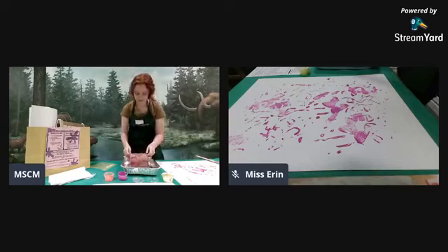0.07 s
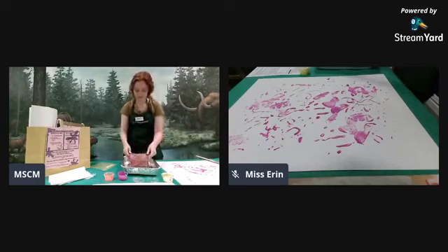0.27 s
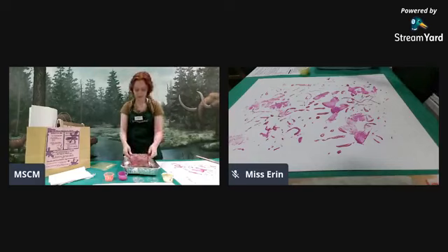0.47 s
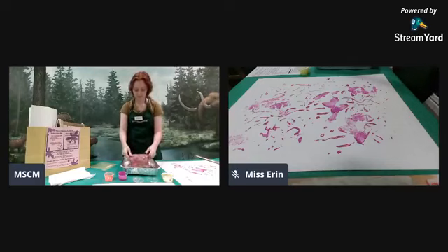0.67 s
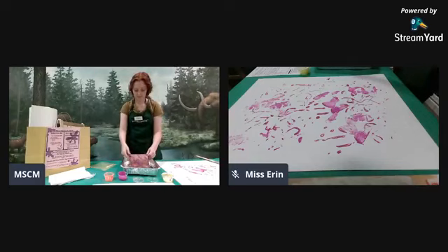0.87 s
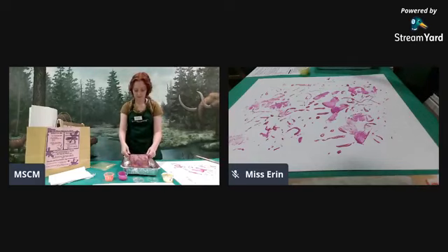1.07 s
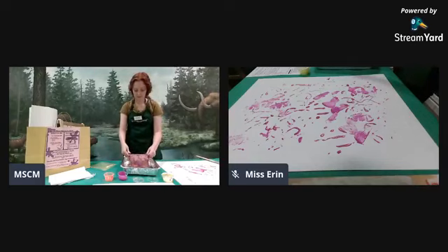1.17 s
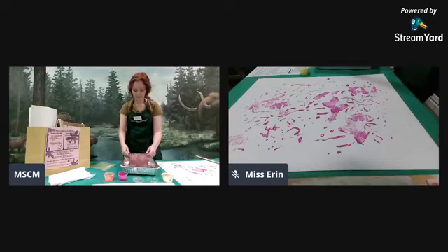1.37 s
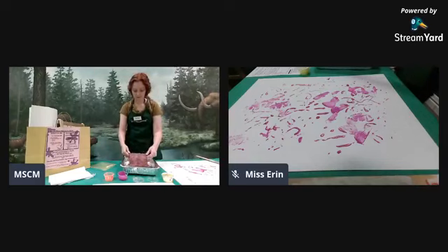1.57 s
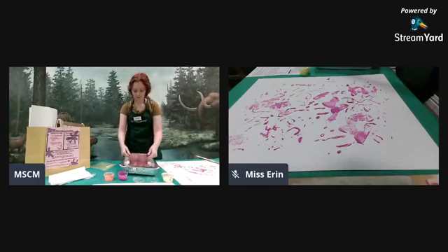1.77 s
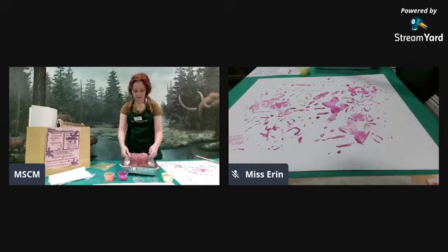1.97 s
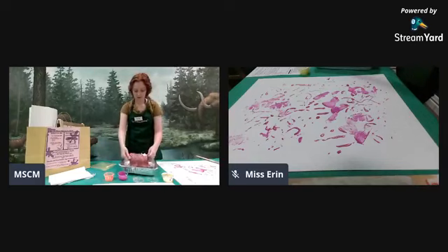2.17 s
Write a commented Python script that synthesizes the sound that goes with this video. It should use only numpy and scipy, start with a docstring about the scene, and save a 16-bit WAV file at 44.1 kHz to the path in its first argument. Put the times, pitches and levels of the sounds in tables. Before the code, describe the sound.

A hand roller works through wet paint in a foil tray on a table, indoors, over a quiet, steady hum and hiss. Each pull releases a short cluster of sticky snaps that gives the tray a hollow rattle and rings briefly in the room. One clear snap comes right at the start, then an irregular run of lighter ones from about 0.2 to 0.8 seconds, with tiny bright foil ticks. After a short lull, stronger pulls arrive from 1.1 seconds, the loudest at about 1.4 seconds. Softer pulls follow from 1.5 to 2.1 seconds, with three faint, thin, wet squeaks between 1.6 and 1.9 seconds. Throughout, the paint sizzles faintly as it splits behind the roller, and the table gives soft low bumps and rumbles, most noticeably around 0.7, 1.2 and 1.5 seconds.

```python
"""A hand roller is worked through wet paint in a foil tray on a table, over a low hum and hiss.
From the start, each pull makes the sticky paint let go in a cluster of snaps that rattles the tray
and rings briefly in the room, while the paint sizzles faintly and the table rumbles.
The loudest pulls come a little past halfway; softer ones and three faint, wet squeaks follow."""
import sys
import numpy as np
from scipy import signal
from scipy.fft import rfft, irfft, next_fast_len
from scipy.io import wavfile
from scipy.ndimage import uniform_filter1d

SR = 44100
rng = np.random.default_rng(int(sys.argv[2]) if len(sys.argv) > 2 else 0)


def to_wav(s):
    """Save 16-bit WAV."""
    ch = np.atleast_2d(s).T  # columns
    pcm = np.round(np.clip(ch, -1, 1) * 32767)  # PCM
    wavfile.write(sys.argv[1], SR, pcm.astype(np.int16))


N = 97946
TIME = np.arange(N) / SR

# pulls of the roller: t/s, length/s, base level/dB, weight on the tray/dB, hardness of the snap/dB,
# pitch of the tray floor's note/Hz, that note's level above the base/dB
PULLS = [(0.024, 0.037, -41.5, -6.5, 3.5, 832, -0.5), (.232, .034, -60.5, 1.5, 8, 867, -17),
         (0.333, 0.035, -66.5, 7, -13, 487, 4.5), (0.3644, 0.034, -49.5, 8.5, -7.5, 955, 1.5),
         (0.423, 0.021, -51, 8, 10.5, 987, 4.5), (.498, 0.018, -49, 6, 2, 952, 1.5),
         (.560, 0.019, -50.5, -13, 4, 922, 2), (0.664, 0.02, -50.5, 9, -15.5, 609, 2.5),
         (0.713, .027, -46, 3, 2, 885, 2), (0.783, 0.022, -65, -16, -16, 820, -2),
         (1.073, 0.044, -52, 5, -7, 780, -10), (1.1498, 0.038, -39, 5, 1.5, 936.5, -5.5),
         (1.262, 0.025, -38.5, -1, 4.5, 760.6, -1), (1.327, 0.028, -53, -0.5, 9, 750, -23),
         (1.3628, 0.03, -30, -5, 9.5, 641, -6), (1.483, 0.048, -51, 2.5, 1.5, 936, -9),
         (1.53, 0.017, -48, 4, -12.5, 965, 2.5), (1.591, 0.023, -48, -12, 1, 814, -8),
         (1.652, 0.018, -48.5, 2, -6.5, 952, 9), (1.846, 0.035, -44.5, -11.5, -2, 640.7, 3),
         (2.011, .039, -49, -9, -2, 852, -8), (2.076, 0.014, -55.5, -6, 4, 829, -13)]
# tone colour of one snap of paint: f/Hz, gain/dB
SNAP_COLOUR = [(120, -42), (250, -11.5), (400, -7), (600, -10.5), (800, 5), (950, 2), (1060, -7.5),
               (1250, -9.5), (1450, -27.5), (1750, -35.5), (3000, -39), (5000, -41), (6200, -58),
               (9000, -49)]


def from_db(db):
    """Turn decibels into a factor to multiply by."""
    return 10 ** (np.asarray(db) / 20)


def rms_one(x):
    """Scale a sound so that its average strength (rms) is 1."""
    return x / np.sqrt(np.mean(x ** 2) + 1e-24)


def even(x, window_s):
    """Smooth out quick changes in loudness."""
    local_power = uniform_filter1d(x * x, max(int(window_s * SR), 2)).clip(0)
    return x / np.sqrt(local_power + 0.046 * np.mean(x * x))


def add(out, s, sound):
    """Mix a sound in, starting at s seconds."""
    i = max(round(s * SR), 0)
    out[i:i + len(sound)] += sound[:N - i]


def band(x, low_hz, high_hz, order=2):
    """Keep the part of a sound between two frequencies."""
    return signal.sosfilt(signal.butter(order, [low_hz, high_hz], "band", fs=SR, output="sos"), x)


def band_noise(size, low_hz, high_hz):
    """Noise of strength 1 between two frequencies."""
    return rms_one(band(rng.standard_normal(size), low_hz, high_hz))


def colour(x, spectrum):
    """Shape a sound's tone by rows of f/Hz, gain/dB."""
    size = next_fast_len(len(x) + 2048)
    hz, db = np.transpose(spectrum)
    bins_hz = np.maximum(np.arange(size // 2 + 1) * SR / size, 1)
    gain = from_db(np.interp(np.log(bins_hz), np.log(hz), db))
    return irfft(rfft(x, size) * gain, size)[:len(x)]


def resonate(x, hz, width_hz):
    """Let a sound ring at one pitch; a narrower width rings longer."""
    r = np.exp(-np.pi * width_hz / SR)
    feedback = [1, -2 * r * np.cos(2 * np.pi * hz / SR), r * r]
    return signal.lfilter(np.array([1, 0, -1]) * (1 - r * r) / 2, feedback, x)


def swells(rows):
    """Smooth rises and falls in loudness, one for each row of peak t/s, length/s, level/dB."""
    return sum(from_db(db) * np.exp(-(2 * (TIME - s) / length) ** 2) for s, length, db in rows)


def wavering(hz, waver_hz, t60, rise_s, wobble_hz):
    """A ring whose pitch wavers as the surface bends; it fades by 60 dB in t60 seconds."""
    t = np.arange(SR // 2) / SR
    pitch = hz + waver_hz * band_noise(len(t), wobble_hz / 8, wobble_hz)
    swing = (1 - np.exp(-t / rise_s)) * from_db(-60 * t / t60)
    return np.sqrt(2) * swing * np.sin(2 * np.pi * np.cumsum(pitch) / SR)


def room(x, t60, echo_db, first_echo_s=0.0057):
    """The direct sound, then a wash of echoes from the walls that dies away."""
    t = np.arange(len(x)) / SR
    tail = rng.standard_normal(len(t)) * from_db(-60 * t / t60) * np.clip(t / first_echo_s - 1, 0, 1)
    echoes = signal.fftconvolve(x, tail)[:len(x)]
    return x + from_db(echo_db) * np.std(x) * rms_one(echoes)


def background(air_db=-76):
    """Electrical mains hum and the steady hiss of the room's air."""
    hum_tones = [(60, -86.5), (119, -81)]   # mains hum: f/Hz, level/dB
    air_colour = [(20, -17), (60, -9), (120, 8), (200, -0.5), (400, -11.5), (800, -6), (1400, -25),
                  (3000, -17.5), (7000, -27), (16000, -39)]   # tone colour of the quiet room: f/Hz, gain/dB
    hum = sum(from_db(db) * np.sqrt(2) * np.sin(2 * np.pi * (hz * TIME + rng.random()))
              for hz, db in hum_tones)
    return hum + from_db(air_db) * rms_one(colour(rng.standard_normal(N), air_colour))


def table_rumble(rest_db=-82.5):
    """The roller's weight makes the table top rumble, most at each shove."""
    shoves = [(.36, 0.046, -69), (.44, .04, -71), (.545, 0.056, -67.5), (.715, 0.084, -64.5),
              (1.03, 0.033, -77), (1.155, 0.022, -71), (1.49, 0.079, -62), (1.57, 0.083, -71),
              (2.05, .05, -71)]   # shoves of the roller: peak t/s, length/s, level/dB
    return np.hypot(swells(shoves), from_db(rest_db)) * band_noise(N, 52, 85)


def table_bumps():
    """The table top gives under the hand with soft, low bumps."""
    bumps = [(0.431, -62, 188.4, 28, .25), (0.502, -64.5, 216, 17, 0.38), (0.719, -55.5, 166.6, 53, 0.31),
             (1.235, -53, 239.7, 19, .35), (1.655, -59.5, 236.4, 17, 0.3), (2.027, -60.5, 116.8, 14, 0.32)]   # bumps of the table: t/s, level/dB, f/Hz, waver/Hz, fade time/s
    out = np.zeros(N)
    for s, db, hz, waver_hz, t60 in bumps:
        add(out, s, from_db(db) * wavering(hz, waver_hz, t60, rise_s=0.0081, wobble_hz=81.4))
    return out


def snaps(size, per_s, spread_db):
    """Threads of paint break at random moments, with uneven strength."""
    strength = from_db(spread_db * np.minimum(rng.exponential(1, size), 4))
    direction = rng.choice([-1, 1], size)
    breaks = rng.random(size) < per_s / SR
    return strength * direction * breaks + 1e-18


def paint_film(boost_db=3.5, rest_db=-79, squeak_hz=7450):
    """The paint splits behind the roller in countless tiny ticks, at times with a smack or a squeak."""
    sizzle_colour = [(1500, -3), (3000, -17.5), (5000, -10), (6500, -10.5), (8000, -8.5), (9200, 0),
                     (10300, 1), (12000, -2), (15500, -1.5)]   # tone colour of the sizzle: f/Hz, gain/dB
    sizzle_levels = [(0, -79), (.3, -80.5), (.42, -75), (.64, -81), (.73, -74.5), (.98, -85.5),
                     (1.17, -73.5), (1.33, -78), (1.58, -75), (1.75, -81), (1.88, -80), (2.02, -80.5),
                     (2.22, -84)]   # sizzle as the roller travels: t/s, level before boost/dB
    smacks = [(.04, .03, -75.5), (.265, 0.073, -71), (.38, .04, -68.5), (.438, .04, -68),
              (1.276, 0.018, -65.5), (1.372, .025, -63), (1.605, 0.059, -71.5), (1.855, 0.064, -70.5),
              (1.925, 0.072, -69.5)]   # wet smacks where the paint tears wide: peak t/s, length/s, level/dB
    squeaks = [(1.607, 0.035, -82), (1.855, 0.021, -82), (1.928, 0.059, -78)]   # thin, wet squeaks: peak t/s, length/s, level/dB
    ticks = rms_one(snaps(N, per_s=1600, spread_db=-2.0))
    sizzle = rms_one(colour(ticks + rng.standard_normal(N), sizzle_colour))
    rolling = from_db(np.interp(TIME, *np.transpose(sizzle_levels)) + boost_db)
    level = np.hypot(rolling, from_db(rest_db))   # the paint never quite stops ticking
    squeaking = swells(squeaks) * band_noise(N, squeak_hz - 280, squeak_hz + 280)
    return np.hypot(level, swells(smacks)) * sizzle + squeaking


def paint_blobs(t60=0.008):
    """Single blobs of paint part, each with a short, bright tick."""
    ticks = [(.231, -83), (.369, -61), (.561, -67), (1.947, -66)]   # parting blobs: t/s, level/dB
    t = np.arange(SR // 5) / SR
    out = np.zeros(N)
    for s, db in ticks:
        add(out, s, from_db(db - 60 * t / t60) * band_noise(len(t), 3500, 16000))
    return out


def tink(hz, waver_hz, t60):
    """A brief, bright ring of thin metal in the room."""
    return room(wavering(hz, waver_hz, t60, rise_s=0.00072, wobble_hz=300), t60=0.07, echo_db=-7)


def foil_creases():
    """Creases in the foil flip, each with its own bright ring."""
    creases = [(.422, -67, 5380, 120, 0.067), (.56, -59, 5030, 302, .03), (0.559, -55, 3350, 780, 0.021),
               (1.369, -53.5, 4810, 502, 0.03)]   # flipping creases: t/s, level/dB, f/Hz, waver/Hz, fade time/s
    out = np.zeros(N)
    for s, db, hz, waver_hz, t60 in creases:
        add(out, s, from_db(db) * tink(hz, waver_hz, t60))
    return out


def roller_frame(lag_s=0.007):
    """Each pull jolts the roller's wire frame into ringing, heavy and hard pulls most of all."""
    # ringing tones of the frame: f/Hz, waver/Hz, fade time/s, level relative to the jolt/dB
    frame_tones = [(4085, 120, 0.28, -37.5), (5040, 140, 0.14, -41.5)]
    out = np.zeros(N)
    for s, _, db, weight, hardness, *_ in PULLS:
        jolt_db = db + weight + 0.5 * hardness
        for hz, waver_hz, t60, tone_db in frame_tones:
            add(out, s + lag_s, from_db(jolt_db + tone_db) * tink(hz, waver_hz, t60))
    return out


def tray_note(length, hz, rise_s=0.0096, ring_t60=0.089, waver=0.035):
    """The tray floor beside the roller rings at a pitch of its own, unsteady as it bends."""
    t = np.arange(SR // 2) / SR
    pitch = hz * (1 + waver * band_noise(len(t), 49, 200))
    swing = (1 - np.exp(-(t / rise_s) ** 2)) * from_db(-60 * np.maximum(t - length, 0) / ring_t60)
    tone = np.sqrt(2) * swing * np.sin(2 * np.pi * np.cumsum(pitch) / SR)
    return room(tone, t60=0.31, echo_db=-15.5)


def tray_rattle(length, rise_s, levels_db, release_s=0.0052, growth_db=0.5, dulling_db_per_s=376.5):
    """A cluster of snaps shakes the tray, heard in five bands from low thud to high crackle."""
    edges_hz = [150, 420, 700, 1050, 1700, 7000]   # edges of the five bands: f/Hz
    resonances = [(296.3, 39, 2), (490.2, 13, 10.5), (521.8, 25.6, 11), (628.4, 19.7, 12.5),
                  (767, 35, -1.5), (883, 30, 5.5), (981.7, 17.3, 2), (1216, 72, -7), (1393, 10, -1),
                  (2700, 49, 3), (4270, 350, -12), (5430, 73, -12.5)]   # where the tray on the table rings: f/Hz, width/Hz, gain/dB
    echoes = [(0.42, 1), (0.22, -1), (0.24, -6.5), (0.23, -5), (0.11, -6)]   # the room's echo in each band: fade time/s, relative level/dB
    t = np.arange(SR // 2) / SR
    spread = np.sin(np.pi / 2 * np.minimum(t / max(rise_s, .001), 1)) ** 2   # the tear runs along the roller
    release = np.exp(-np.maximum(t - length, 0) / release_s)
    grip = spread * from_db(growth_db * np.minimum(t / length, 1)) * release
    tearing = colour(snaps(len(t), per_s=2000, spread_db=1.5), SNAP_COLOUR)
    loud_samples = int((length + .006) * SR)
    out = np.zeros(len(t))
    for low, high, db, (t60, echo_db) in zip(edges_hz, edges_hz[1:], levels_db, echoes):
        dulling = from_db(-dulling_db_per_s * t * low / edges_hz[-2])   # lower bands fade more slowly
        force = grip * dulling * even(band(tearing, low, high, order=4), window_s=.008)
        ringing = sum(from_db(gain_db) * resonate(force, hz, width) for hz, width, gain_db in resonances)
        heard = room(force + ringing, t60, echo_db)
        out += from_db(db) * heard / np.std(heard[:loud_samples])
    return out


def tray_pulls(note_lag_s=0.00199, overtone_ratio=1.8, overtone_db=-8.5):
    """Each pull rattles the tray and wakes a note; weight brings out the lows, hardness the highs."""
    # how each band answers a pull: gain/dB, share of the weight, share of the hardness
    answers = [(-16, 0.76, 0.28), (-4, 0.46, 0.021), (0.76, -0.022, 0.031), (-17.5, 0.013, 1.0),
               (-29.5, 0.24, 1)]
    out = np.zeros(N)
    for s, length, db, weight, hardness, hz, note_db in PULLS:
        levels_db = [db + band_db + by_weight * weight + by_hardness * hardness
                     for band_db, by_weight, by_hardness in answers]
        rise_s = 0.0082 * 2 ** (-(weight + hardness) / 13)   # a heavy, hard pull tears faster
        add(out, s, tray_rattle(length, rise_s, levels_db))
        held_s = 0.94 * length   # the note holds for most of the tear
        overtone_hz = overtone_ratio * hz
        snap_db = np.interp(overtone_hz, *np.transpose(SNAP_COLOUR))   # the snap's strength at that pitch
        overtone = from_db(overtone_db + snap_db) * tray_note(held_s, overtone_hz)
        add(out, s + note_lag_s, from_db(db + note_db) * (tray_note(held_s, hz) + overtone))
    return out


def scene():
    """Tray, roller, paint, table and background, mixed into one channel."""
    metal = tray_pulls() + roller_frame() + foil_creases()
    paint = paint_blobs() + paint_film()
    table = table_rumble() + table_bumps()
    return (metal + paint + table + background())[None]


def record(dry):
    """Cut away the very highest treble steeply."""
    cutoff_hz = 15750
    return signal.sosfilt(signal.ellip(12, .1, 80, cutoff_hz, fs=SR, output="sos"), dry)


dry = scene()
out = record(dry)
to_wav(out)
```